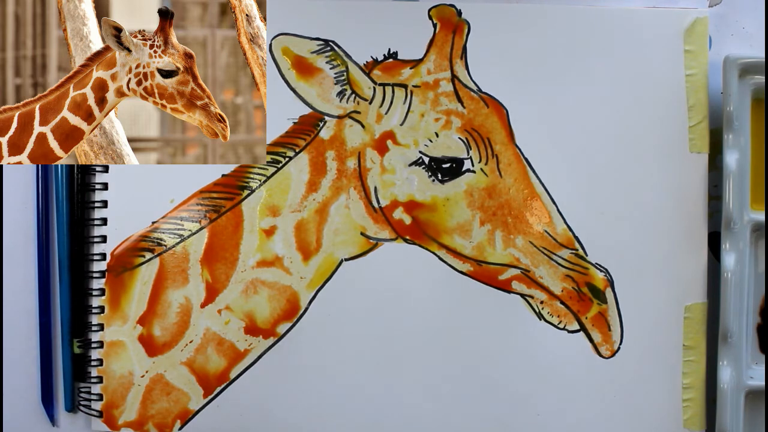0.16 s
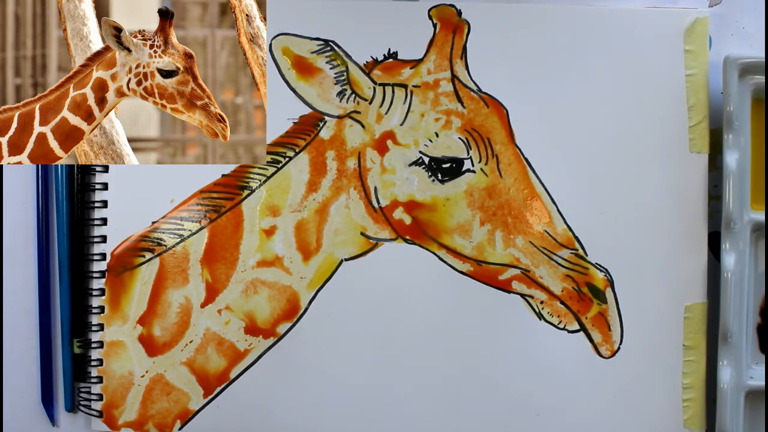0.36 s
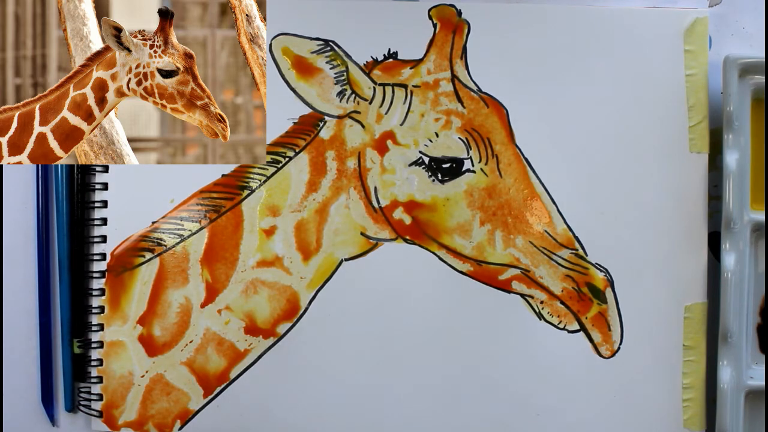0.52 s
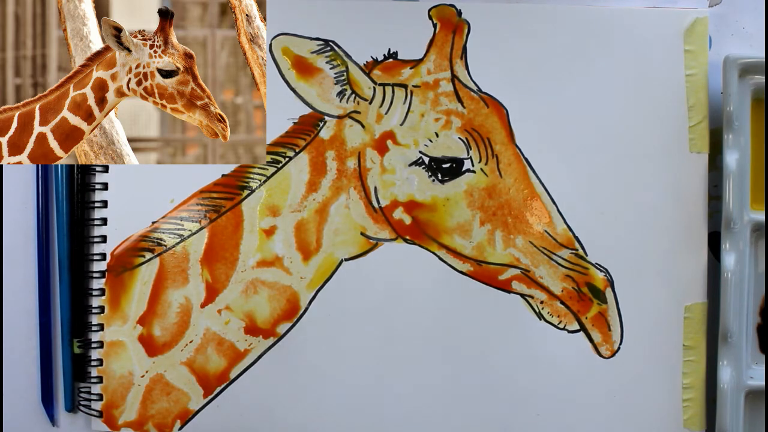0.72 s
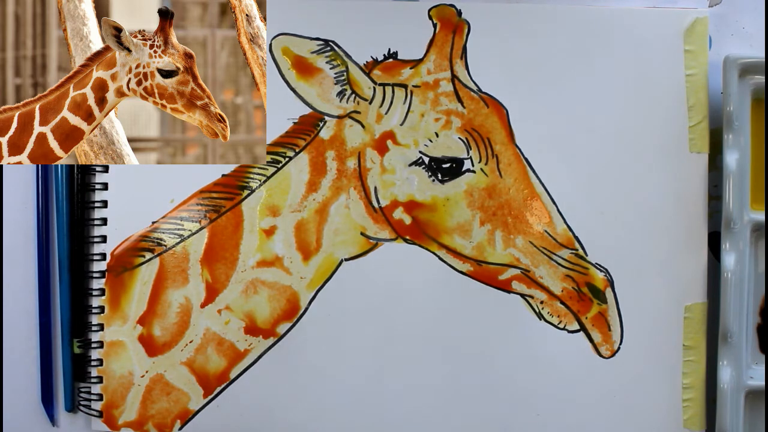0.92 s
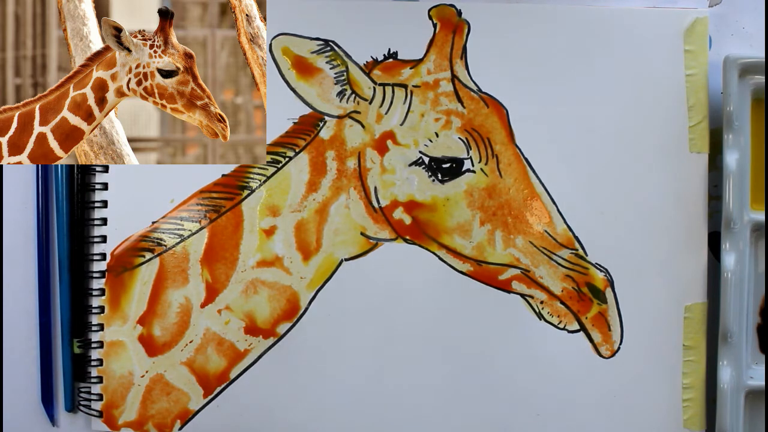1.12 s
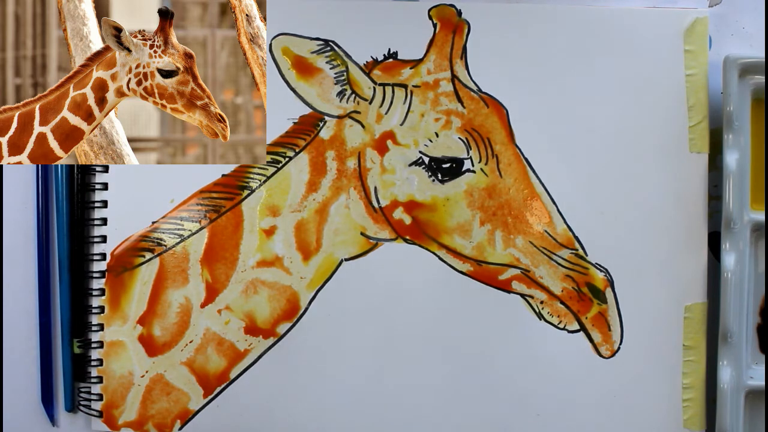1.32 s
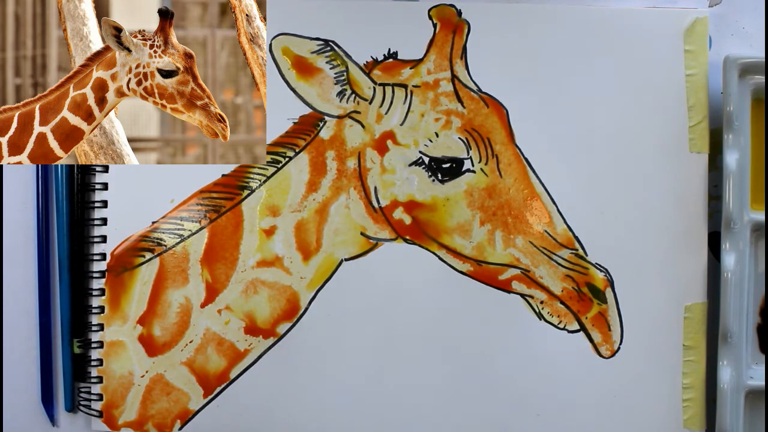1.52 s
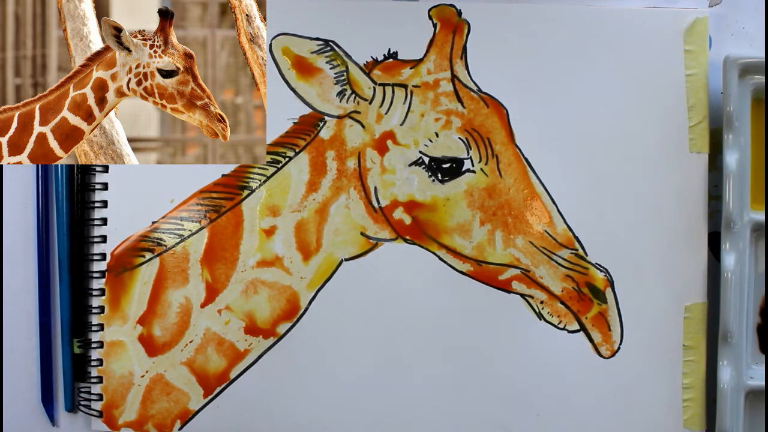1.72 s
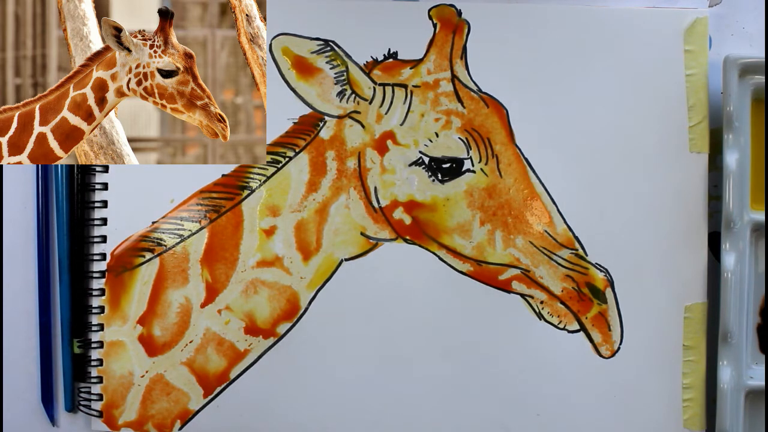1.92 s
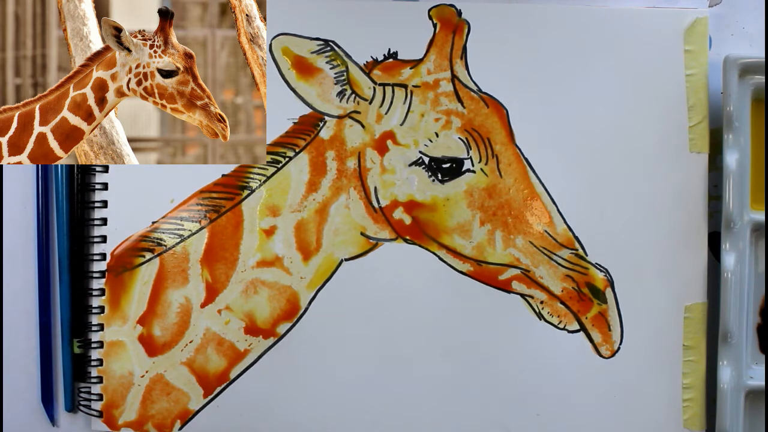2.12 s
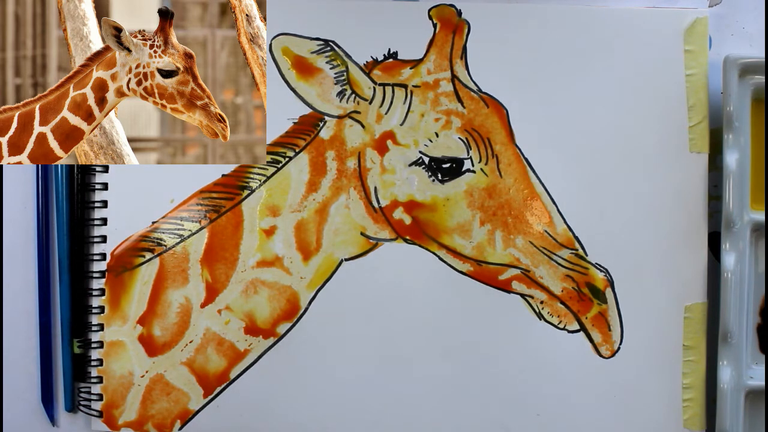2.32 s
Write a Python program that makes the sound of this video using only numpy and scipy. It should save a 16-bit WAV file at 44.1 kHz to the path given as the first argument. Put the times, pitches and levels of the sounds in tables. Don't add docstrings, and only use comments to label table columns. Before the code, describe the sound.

Brush stirred briskly in a water jar, a few drips, one bright glass clink, faint wiping

```python
import sys
import numpy as np
from scipy import signal
from scipy.fft import rfft, irfft, next_fast_len
from scipy.io import wavfile
from scipy.ndimage import uniform_filter1d, map_coordinates

SR = 44100
rng = np.random.default_rng(int(sys.argv[2]) if len(sys.argv) > 2 else 0)


def invert_db(x):
    u = np.asarray(x, float) / 20
    return 10 ** u


def wav_record(signal):
    frames = np.transpose(np.atleast_2d(signal))
    bounded = np.clip(frames, -1, 1)
    quanta = np.round(bounded * 32767).astype(np.int16)
    wavfile.write(sys.argv[1], SR, quanta)


N = 108177
CLINK_S, CLINK_DB = 1.4288, -0.7
ATTACK_S = 0.0006
RISE_PER_S = 1.2
BUBBLE_WAVER, BUBBLE_HOLD = 0.006, 1.5


def unit(x):
    return x / np.sqrt(np.mean(x ** 2) + 1e-20)


def along(points, hz):
    f, v = np.transpose(points)
    return np.interp(np.log(hz + 1), np.log(f + 1), v)


def level(rows):
    return invert_db(np.interp(np.arange(N) / SR, *np.transpose(rows)))


def filtered(x, response):
    m = next_fast_len(len(x) + 8192)
    return irfft(rfft(x, m) * response(np.fft.rfftfreq(m, 1 / SR)), m)[:len(x)]


def peak(f, hz, width):
    return 1j * f * width / (hz * hz - f * f + 1j * f * width)


def noise(spectrum, patchy_db):
    z = signal.stft(rng.standard_normal(N + 512), nperseg=256)[2]
    patches = uniform_filter1d(rng.standard_normal(z.shape), 4, axis=0)
    patches = uniform_filter1d(patches, 12, axis=1)
    x = signal.istft(z * invert_db(patchy_db * unit(patches)), nperseg=256)[1][:N]
    return unit(filtered(x, lambda f: invert_db(along(spectrum, f))))


def add(track, s, sound):
    part = track[round(s * SR):][:len(sound)]
    part += sound[:len(part)]


def ring(hz, db, t60, rise=0, attack=0.00046, waver=0, hold=1):
    t = np.arange(int(SR * min(t60 * 1.5, 1))) / SR
    wander = map_coordinates(rng.standard_normal(128), [t * 100])
    drift = np.cumsum(wander) / SR * waver
    envelope = invert_db(db - 60 * (t / t60) ** hold) * (1 - np.exp(-t / attack))
    return envelope * np.sin(2 * np.pi * hz * (t + rise * t * t / 2 + drift))


def crack(db, t60, hz, width):
    t = np.arange(SR // 4) / SR
    burst = invert_db(-60 * t / t60) * rng.standard_normal(len(t))
    return invert_db(db) * filtered(burst, lambda f: peak(f, hz, width) * peak(f, hz, 2 * width))


# frequency_hz, density_db
ROOM_TONE = [(12, -25), (20, -1), (113, -1.5), (204, -8), (228, -13.5), (513, -20.5), (2910, -24),
             (8410, -35.5), (16000, -50.5)]
# time_s, level_db
MURK_LEVEL = [
    (0, -50.5),
    (.45, -46),
    (.62, -57),
    (.8, -67),
    (.95, -49.5),
    (1.2, -55.5),
    (1.4, -52),
    (2.0, -64),
    (2.45, -51),
]
# frequency_hz, density_db
SLOSH_SPECTRUM = [(60, -4), (150, -1), (500, -0.5), (1200, -6), (3000, -18), (8000, -57)]
# time_s, level_db
RUSTLE_LEVEL = [
    (1.55, -61.5),
    (1.9, -49.5),
    (2.02, -55),
    (2.12, -52),
    (2.45, -48.5),
]
# frequency_hz, density_db
CLOTH_SPECTRUM = [(400, -3.5), (1500, 3.5), (7000, 1), (9500, -7), (13000, -28.5), (16000, -37)]


def background():
    tone = invert_db(-49) * noise(ROOM_TONE, patchy_db=-1)
    slosh = level(MURK_LEVEL) * noise(SLOSH_SPECTRUM, patchy_db=3.0)
    rustle = level(RUSTLE_LEVEL) * noise(CLOTH_SPECTRUM, patchy_db=1.0)
    return tone + slosh + rustle


# frequency_hz, t60_s
ROOM_DECAY = [(200, 0.71), (2000, 0.36), (6000, 0.34), (12000, 0.2)]


def room(x):
    hz, t, z = signal.stft(rng.standard_normal(SR // 2), SR, nperseg=256)
    decay = invert_db(-60 * t / along(ROOM_DECAY, hz)[:, None])
    tail = signal.istft(z * decay, SR, nperseg=256)[1]
    return signal.fftconvolve(np.pad(x, (200, 0)), tail / np.linalg.norm(tail))[:N]


# start_s, peak_db, centre_hz
TAPS = [(.01, -51, 10500), (0.161, -33.5, 5500), (.19, -45, 9000), (0.609, -43, 9100), (0.661, -42.5, 7600),
        (.735, -51, 9200), (1.1307, -42, 9300), (1.239, -48, 7000), (1.343, -44.5, 9400),
        (1.579, -29.5, 1370), (1.672, -46, 9500), (1.994, -41.5, 9700), (2.097, -37.5, 5150),
        (2.107, -30, 1530), (2.322, -35.5, 5100), (2.321, -24.5, 1430)]


def taps():
    out = np.zeros(N)
    for s, db, hz in TAPS:
        add(out, s, crack(db, t60=0.048, hz=hz, width=hz * 1.42))
    return out


# start_s, peak_db, pitch_hz
SPLASHES = [(.001, -49, 8200), (.009, -28.5, 10600), (.01, -53, 9100), (.036, -37, 1915), (.041, -46, 6020),
            (.041, -52, 8050), (.046, -44, 6945), (.059, -52, 6615), (.059, -47, 9250), (.101, -35, 2756),
            (.124, -44, 6945), (.134, -43, 4200), (.134, -46, 6615), (.14, -44, 8000), (.145, -43, 5100),
            (.16, -41, 7200), (.168, -56, 7200), (.162, -35.5, 2730), (.172, -36, 2740), (.178, -47, 7830),
            (.189, -41, 8460), (.192, -44, 7650), (.192, -47, 6350), (.204, -44, 8240), (.205, -44, 4930),
            (.207, -40, 2750), (.217, -36, 4890), (.23, -28.5, 1097), (.263, -40, 4980), (.263, -50, 8050),
            (.263, -44, 7200), (.276, -38, 1630), (.283, -53, 4900), (.285, -43, 7800), (.297, -42, 8710),
            (.298, -35, 3300), (.299, -42, 2950), (.308, -35.5, 3260), (.319, -41, 2200), (.319, -42, 1500),
            (.332, -37.5, 1197), (.358, -39, 2940), (.362, -41.5, 8000), (.364, -50, 4940),
            (.364, -51, 5460), (.377, -44, 5770), (.377, -38.5, 3670), (.38, -54, 1505), (.38, -41, 899),
            (.385, -51, 2980), (.426, -44, 5200), (.878, -48, 6930), (.895, -45.5, 4700),
            (1.032, -44.5, 6700), (1.096, -52, 8000), (1.238, -47, 6300)]


def splashes():
    out = np.zeros(N)
    for s, db, hz in SPLASHES:
        add(out, s, ring(hz, db, 127 / hz, RISE_PER_S, ATTACK_S, 2 * BUBBLE_WAVER, BUBBLE_HOLD))
        add(out, s, crack(db - 1, t60=0.024, hz=hz, width=hz * .4))
    return out


# start_s, peak_db, pitch_hz, t60_s
BUBBLES = [(.001, -11.5, 1044, 0.012), (.006, -16, 1285, 0.019), (.007, -26, 2476, 0.036),
           (.029, -17, 1130, 0.078), (.047, -27.5, 3690, 0.0072), (.059, -31.5, 7750, 0.0057),
           (0.085, -35.5, 3300, 0.062), (0.088, -32, 1500, 0.033), (0.09, -23.5, 2084, 0.031),
           (0.125, -34.5, 2590, 0.081), (0.127, -47, 7900, 0.046), (0.162, -43.5, 7940, 0.084),
           (.161, -41, 5350, 0.098), (0.161, -28, 1300, .03), (.229, -31.5, 4940, 0.038),
           (.225, -32, 3580, 0.029), (.243, -15, 1424, 0.043), (0.2479, -16, 1543, 0.031),
           (0.259, -28.5, 3210, 0.054), (.272, -33, 638, 0.093), (.293, -21.5, 1196, 0.037),
           (.298, -35.5, 8030, 0.033), (.305, -32, 6740, 0.039), (0.36, -15, 1500, 0.004),
           (0.365, -27.5, 1090, 0.092), (.061, -37, 2756, 0.08), (.321, -37.5, 2670, 0.13),
           (.306, -31.5, 603, 0.049), (.328, -36, 620, 0.15), (.012, -25, 770, 0.061),
           (.054, -31.5, 780, 0.086)]
# start_s, peak_db, pitch_hz,
# t60_s
DROPS = [(.624, -40, 3290, 0.037), (.662, -47, 4000, 0.087), (.8746, -25, 1990, 0.0099),
         (.927, -47.5, 6840, 0.049), (1.0203, -27.5, 3090, 0.013), (1.025, -35.5, 3750, 0.053),
         (1.04, -50.5, 3950, 0.25), (1.0751, -34, 1920, 0.021), (1.0841, -21, 2100, 0.0049),
         (1.085, -35, 3590, 0.019), (1.1111, -27, 1694, 0.045), (1.128, -24, 1810, 0.02),
         (1.131, -37.5, 8100, 0.013), (1.1535, -29, 1824, 0.039), (1.16, -44, 1840, .04),
         (1.2163, -31.5, 1440, 0.02), (2.098, -40.5, 1714, 0.072), (2.11, -36, 5200, 0.011),
         (2.23, -55, 5120, 0.17), (2.266, -49.5, 5110, 0.2), (2.3215, -27.5, 1850, 0.012)]


def bubbles():
    out = np.zeros(N)
    for s, db, hz, t60 in [*BUBBLES, *DROPS]:
        rise = min(RISE_PER_S, 0.04 / t60)
        add(out, s, ring(hz, db, 0.65 * t60, rise, ATTACK_S, BUBBLE_WAVER, BUBBLE_HOLD))
        add(out, s, crack(db - 5, t60=0.049, hz=hz * 1.02, width=hz * 0.56))
    return out


# time_s, level_db
SWISH_LEVEL = [
    (0, -28),
    (.06, -38),
    (.115, -40.5),
    (.14, -34),
    (.2, -35),
    (.235, -46),
    (.3, -36),
    (.39, -35.5),
    (.43, -58),
]
# frequency_hz, width_hz, level_db
WET_JAR = [(597, 15, -28), (1090, 19, -1), (1168.6, 22, -4), (1500, 450, -5.5), (2740, 84, -12.5),
           (3300, 73, -14), (5100, 40, -21)]


def stirring():
    knocks_per_s, knock_spread_db, churn_db, fizz_db = 200, 4, -7, -7
    grain_hz, grain_spread, grain_db = 2682, 0.7, -18
    strength = level([*SWISH_LEVEL, (.45, -30), (.5, -100)])
    jar, grains = np.zeros(N), np.zeros(N)
    for hz, width, db in WET_JAR:
        struck = rng.random(N) < knocks_per_s / SR
        knocks = struck * invert_db(knock_spread_db * rng.standard_normal(N))
        drive = unit(knocks) + invert_db(churn_db) * rng.standard_normal(N)
        mode = filtered(drive, lambda f: peak(f, hz, width) * peak(f, hz, 6 * width))
        jar += invert_db(db) * unit(mode)
    for when, pitch, size in zip(rng.random(260), *rng.standard_normal((2, 260))):
        hz = np.clip(grain_hz * np.exp(grain_spread * pitch), 500, 9500)
        db = grain_db + 4 * size - 3 * np.log2(hz / grain_hz)
        add(grains, 0.35 * when, ring(hz, db, 6.6 / hz + 0.026, rise=4.6, attack=ATTACK_S))
    fizz = noise([(200, -19), (1200, 20), (4000, -36), (9000, -10), (14000, -59)], patchy_db=2)
    return strength * (0.44 * jar + grains + invert_db(fizz_db) * fizz)


# start_s, peak_db, brightness_db_per_octave
RATTLE = [
    (0.4376, -13.5, -3.5),
    (0.4512, -10.5, 2),
    (0.4806, -22, -3),
]
WALL_HZ = [205, 120, 750, 1150, 1390, 2620, 2960, 3550, 4910, 5020, 5200, 7050, 8400]
# level_db, t60_s
WALL_MODES = [(-23, 0.11), (-22.5, 0.13), (-13.5, 0.033), (-11, 0.043), (-19.5, 0.049), (-3, 0.034),
              (1.5, 0.013), (-7, 0.022), (0.5, 0.039), (-18.5, 0.18), (-11, 0.071), (-10, 0.021),
              (-28, 0.03)]
# frequency_hz, level_db, t60_s
MORE_RATTLE_MODES = [(2750, -15, 0.11), (3200, -11, 0.046), (3860, -2, 0.017), (4490, -12, 0.032),
                     (4580, -11, 0.032), (4720, -21, 0.17), (5780, -17, 0.044)]


def rattle():
    out = np.zeros(N)
    wall = [(hz, *mode) for hz, mode in zip(WALL_HZ, WALL_MODES)]
    for s, db, bright_db in RATTLE:
        for hz, mode_db, t60 in [*wall, *MORE_RATTLE_MODES]:
            tilt_db = bright_db * np.log2(max(hz, 700) / 3000) + rng.normal(0, 1.5)
            add(out, s, ring(hz, db + mode_db + tilt_db, t60, waver=BUBBLE_WAVER))
        add(out, s, crack(db - 1.5, t60=0.017, hz=4000, width=2500))
        add(out, s, crack(db - 4.5 - bright_db, t60=0.088, hz=1620, width=4900))
    return out


# level_db, t60_s
REBOUND_MODES = [(-39, 0.85), (-38, 0.55), (-41.5, 0.31)]


def rebound():
    out = np.zeros(N)
    for k, (hz, (db, t60)) in enumerate(zip([2333, 2349.5, 5240], REBOUND_MODES)):
        add(out, 1.583, (-1) ** k * ring(hz, db, t60, attack=0.0053))
    return out


# start_s, peak_db, brightness_db_per_octave
NUDGES = [
    (.875, -37.5, -13),
    (1.085, -32, -6),
    (1.132, -36.5, 3.5),
]
# frequency_hz, t60_s
NUDGE_MODES = [(2350, 0.15), (5200, 0.17)]


def nudges():
    out = np.zeros(N)
    for s, db, bright_db in NUDGES:
        for hz, t60 in NUDGE_MODES:
            mode_db = db + (bright_db - 17.0) * np.log2(hz / 2345)
            add(out, s, ring(hz, mode_db, t60, attack=0.0028, waver=0.005))
    return out


RIM_HZ = [200, 2340, 3780, 4517, 5873, 5222, 5200, 5238, 5356, 7310, 7913, 8150, 9200, 9927]
# level_db, t60_s
RIM_MODES = [(-38.5, 0.28), (-23.5, 0.34), (-21, 0.12), (-10, 0.028), (-34, 0.09), (-1.5, 0.063),
             (7.5, 0.0041), (-35, 0.69), (-29, 0.33), (-22, 0.09), (-11.5, 0.027), (-25, 0.27),
             (-14, 0.024), (-15.5, 0.05)]


def clink():
    out = np.zeros(N)
    for hz, (mode_db, t60) in zip(RIM_HZ, RIM_MODES):
        add(out, CLINK_S, ring(hz, CLINK_DB + mode_db, t60, attack=0.00033, waver=0.0025))
    add(out, CLINK_S, crack(CLINK_DB, t60=0.0098, hz=5200, width=4100))
    add(out, CLINK_S, crack(CLINK_DB - 9.5, t60=0.028, hz=2190, width=2200))
    add(out, CLINK_S, crack(CLINK_DB - 27.0, t60=0.036, hz=6000, width=970))
    add(out, CLINK_S, crack(CLINK_DB - 22.5, t60=0.27, hz=5300, width=2800))
    return out


# frequency_hz, gain_db
MIC_RESPONSE = [(9000, -1.5), (11000, -16.5), (16000, -31)]


def scene():
    water = stirring() + bubbles() + splashes() + taps() + rattle()
    glass = clink() + nudges()
    near = water + invert_db(-12) * room(water) + glass + rebound() + invert_db(-13) * room(glass)
    heard = filtered(near, lambda f: invert_db(along(MIC_RESPONSE, f)))
    return (heard + filtered(background(), lambda f: f < 15700))[None]


def roll_off(x):
    return signal.sosfilt(signal.butter(12, 16770, fs=SR, output="sos"), x)


def record(dry):
    duck_db, duck_in_s, duck_hold_s, duck_out_s = -9.5, 0.0078, 0.09, 0.051
    hardness = 6
    s = CLINK_S + 0.0057
    gain = level([(s, 0), (s + duck_in_s, duck_db), (s + duck_hold_s, duck_db),
                  (s + duck_hold_s + duck_out_s, 0)])
    bass = filtered(dry[0], lambda f: 1 / (1 + (f / 200) ** 4))
    ducked = bass + (dry - bass) * gain
    mix = ducked / (1 + np.abs(ducked) ** hardness) ** (1 / hardness)
    return roll_off(mix)


dry = scene()
out = record(dry)
wav_record(out)
```